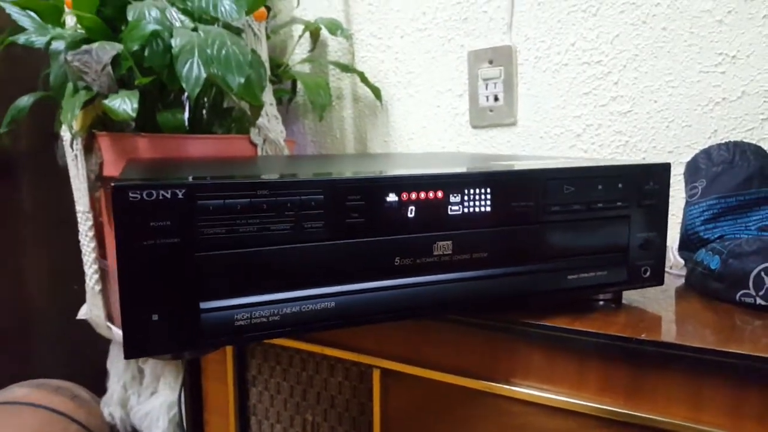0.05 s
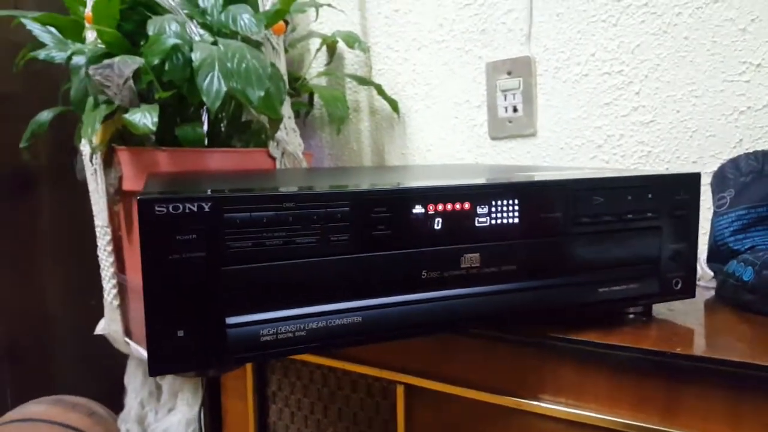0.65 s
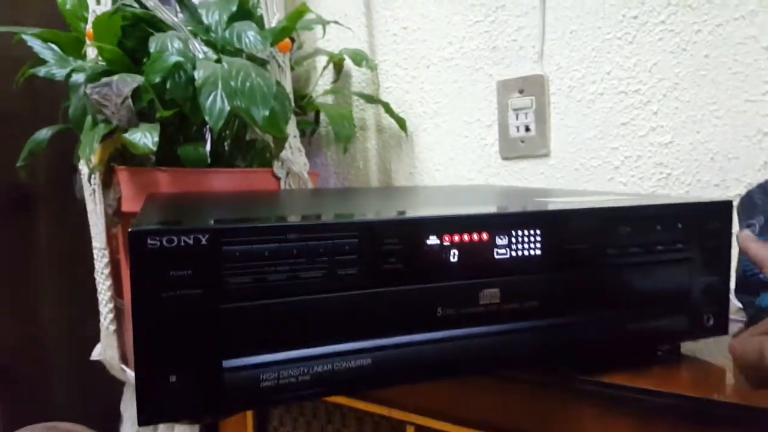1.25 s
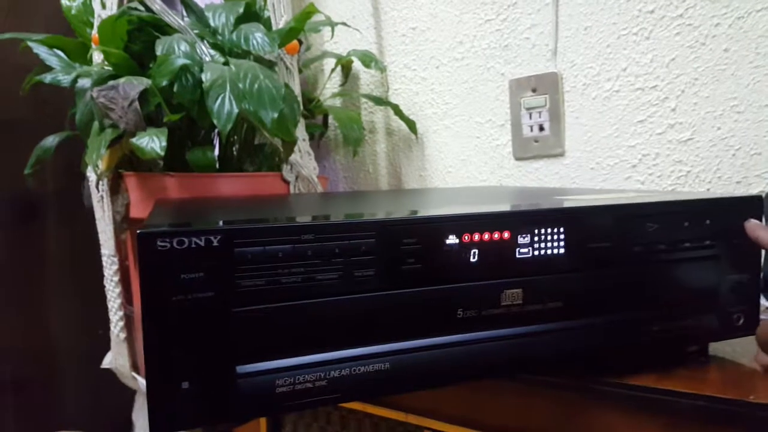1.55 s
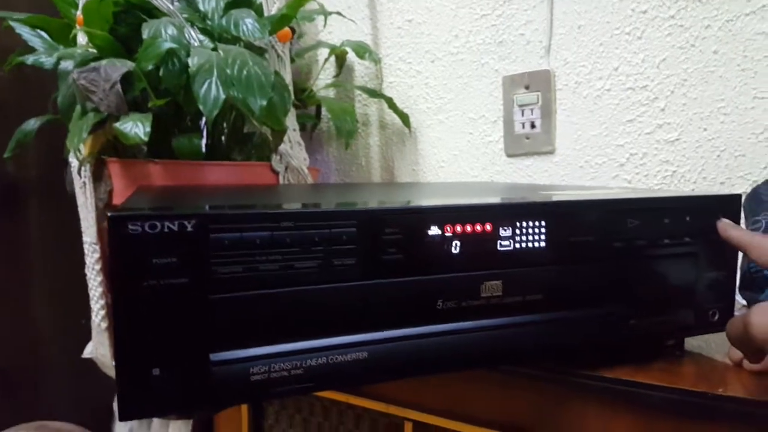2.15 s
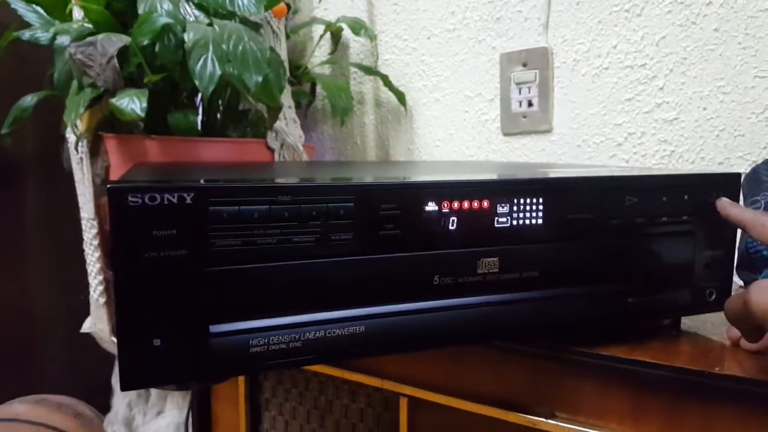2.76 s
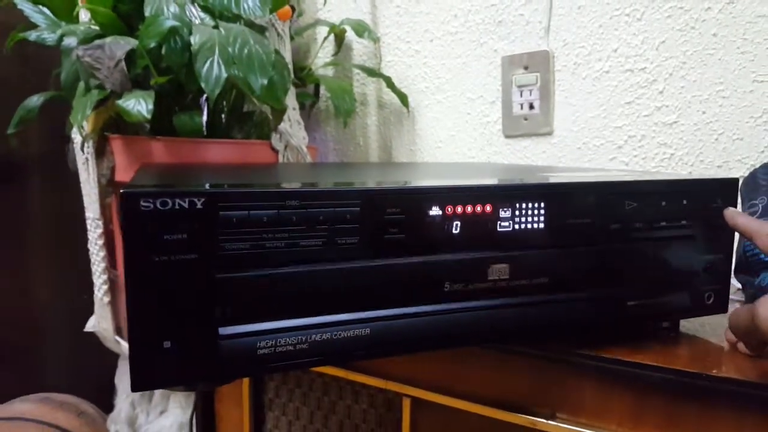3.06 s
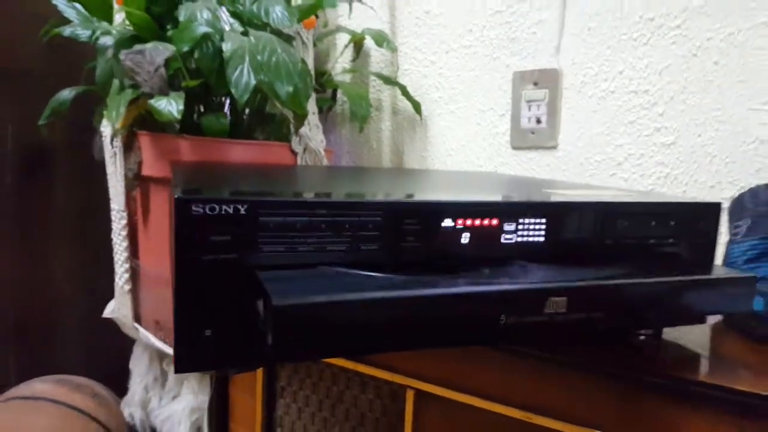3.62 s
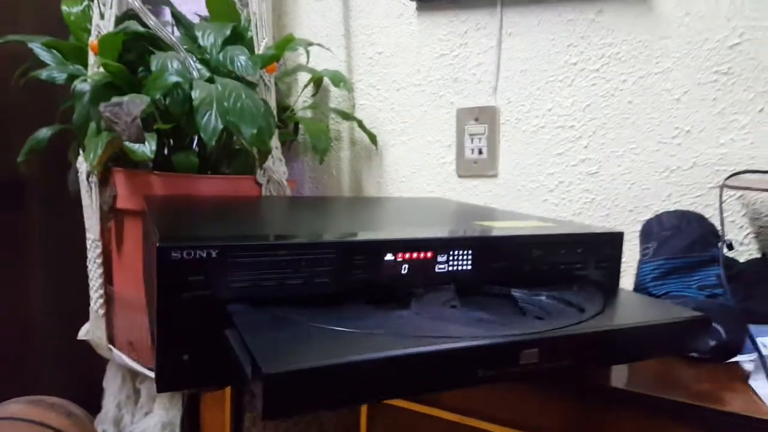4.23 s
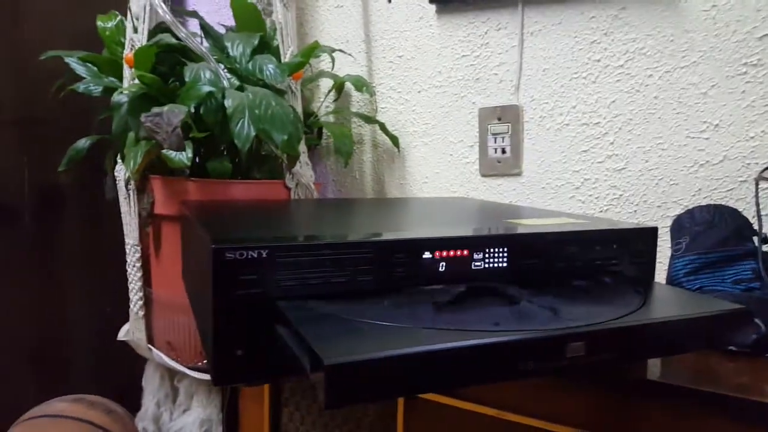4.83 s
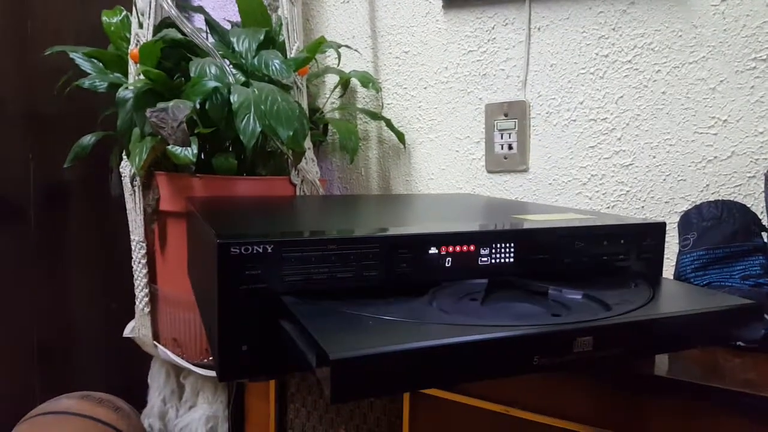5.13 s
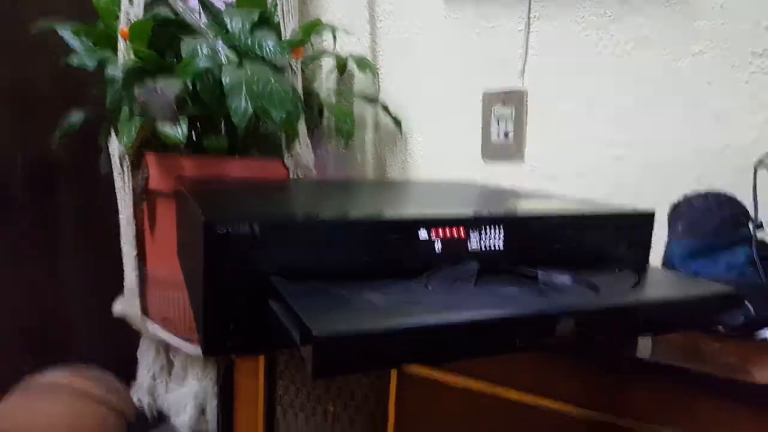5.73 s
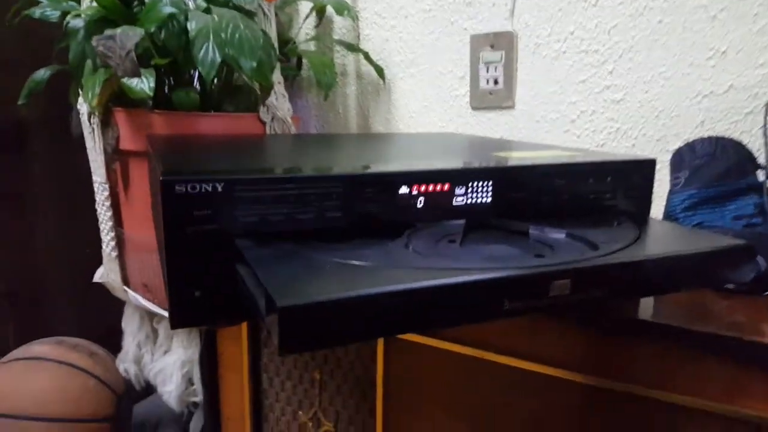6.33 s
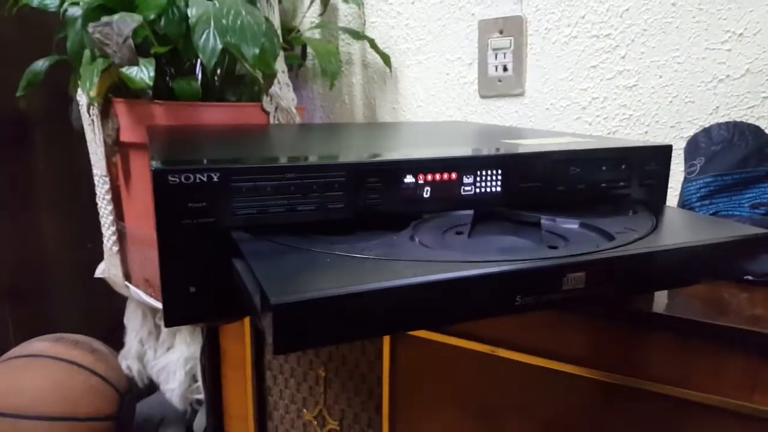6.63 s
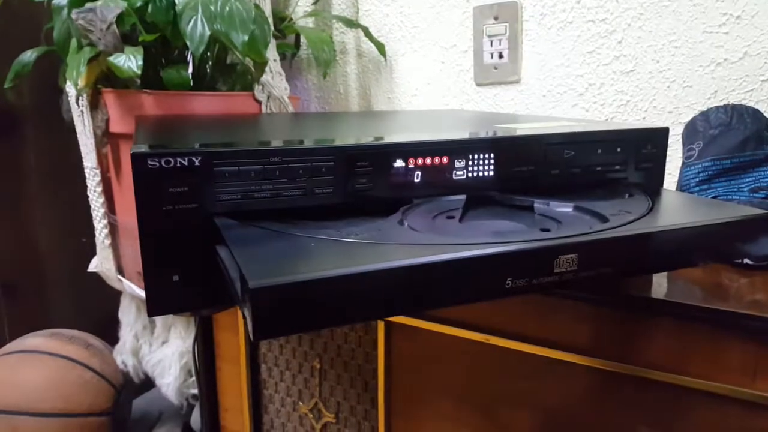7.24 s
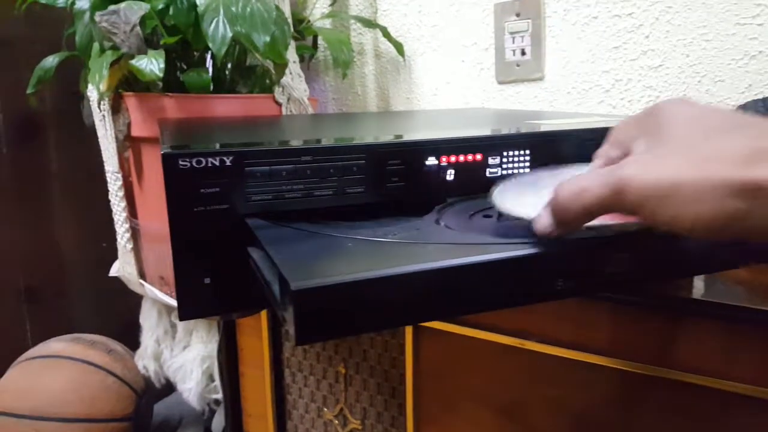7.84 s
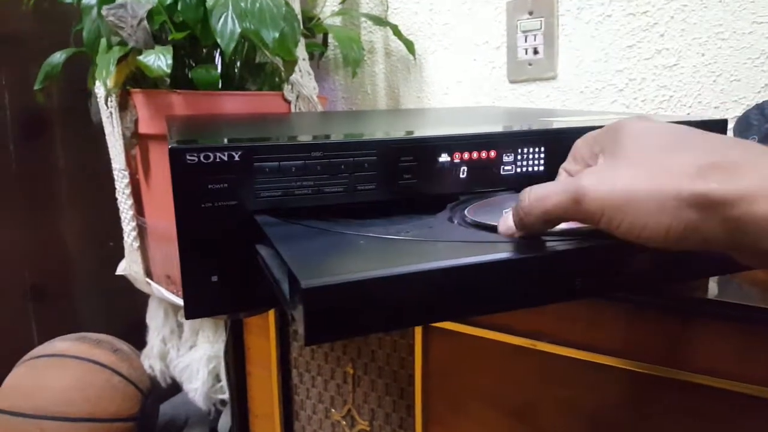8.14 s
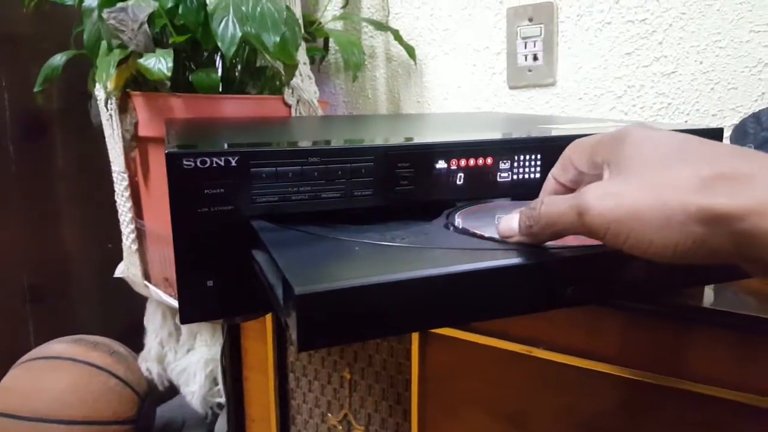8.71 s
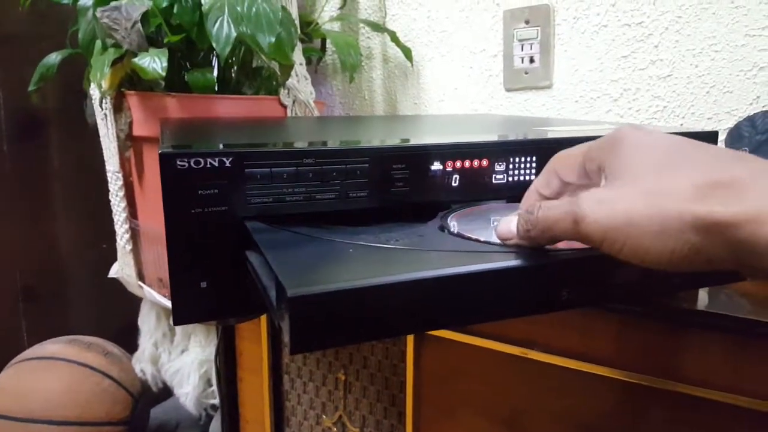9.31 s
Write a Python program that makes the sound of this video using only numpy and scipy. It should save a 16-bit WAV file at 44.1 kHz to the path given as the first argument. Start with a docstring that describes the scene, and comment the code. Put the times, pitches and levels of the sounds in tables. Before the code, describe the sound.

Plastic clicks and whirring gears as a disc player's tray slides out in a quiet room, then a disc clatters into place.

```python
"""A disc changer opens.

A five-disc changer stands on a wooden cabinet in a small, quiet room, about a metre away. Its carousel
rattles round, a latch lets go, the geared tray whirs out and the carousel turns once more. A hand then
clacks a disc into the plastic tray. Impacts ring the modes of tray and case, and sliding parts sound by
stick-slip friction. Mains hum and a faint clock go on underneath."""
import sys
import numpy as np
from scipy import signal
from scipy.fft import rfft, irfft, next_fast_len
from scipy.io import wavfile
from scipy.ndimage import uniform_filter1d

SR = 44100
rng = np.random.default_rng(int(sys.argv[2]) if len(sys.argv) > 2 else 0)


def dump_mix(stems):
    """Bounce the given channels to the path in sys.argv[1] as a 16-bit WAV at rate SR."""
    frames = np.atleast_2d(stems).T  # one column per channel
    limited = np.clip(frames, -1, 1)  # hard clip at full scale
    pcm = np.round(limited * 32767).astype(np.int16)
    wavfile.write(sys.argv[1], SR, pcm)


N = 417627
TIME = np.arange(N) / SR

# low-frequency response of the case: (frequency [Hz], level [dB])
CASE_SPECTRUM = [(45, -28), (80, -5), (115, 4), (165, -3), (240, -0.5), (330, -6), (450, -12), (900, -20),
                 (3000, -94)]


def mechanism_knocks():
    """Impact excitation: cams, latch, end stop and loose gears strike tray and case."""
    # (time [s], level [dB], relative crack [dB], relative thump [dB], part pitch [Hz], crack pitch [Hz])
    blows = [(.511, -50, -40, -29, 1500, 5030), (.644, -40, -29.5, -17, 2300, 7450),
             (.651, -41.5, -36, -13, 1440, 5000), (.68, -47.5, -29, -8, 605, 5000),
             (1.77, -44.5, -34, -7, 770, 4000), (1.862, -37, -27.5, -13, 567, 5500),
             (1.99, -41.5, -46, -9, 710, 5000), (2.275, -45, -40, -11, 1280, 4000),
             (2.3625, -37, -17, -25, 1090, 8700), (2.385, -41.5, -28, -12, 1200, 7500),
             (2.405, -41, -41, -15, 700, 5000), (2.771, -47.5, -49, -9, 604, 5000),
             (2.968, -35.5, -14.5, -20, 2430, 7540), (2.981, -40.5, -36, -5, 1100, 5000),
             (3.039, -40.5, -23, -9, 690, 8500), (3.064, -53, -5.5, -20, 1200, 4800),
             (3.0735, -30, -21, -16, 1656, 3050), (3.11, -41, -22, 0.5, 603, 6500),
             (3.361, -36, -34, -8.5, 1560, 3000), (3.511, -42.5, -22, -18, 1560, 3200),
             (4.277, -37, -32, -17, 890, 3000), (5.295, -49, -24, -8, 2200, 3000)]
    # spectra of the struck body and of the contact: (frequency [Hz], level [dB])
    body_spectrum = [(150, -66), (400, 4), (650, 10), (1000, 4), (1600, 4), (2300, -2.5), (3600, -24),
                     (5000, -40), (10000, -32)]
    crack_spectrum = [(1000, -42), (2500, 8.5), (3600, 3.5), (5000, 0.5), (6500, 1), (9200, -5.5),
                      (10500, -18), (16000, -18)]
    return impacts(blows + light_knocks(), body_spectrum, crack_spectrum,
                   body_t60=.092, crack_t60=.052, thump_t60=.18, contact_s=.00019,
                   body_db=-11, ring_db=-23.5, crack_db=2.5, thump_db=-1.5, part_db=4)


def disc_clacks():
    """Impact excitation: the disc meets the plastic tray and rattles into place."""
    # (time [s], level [dB], relative crack [dB], relative thump [dB], part pitch [Hz], crack pitch [Hz])
    blows = [(7.953, -44, -35, -2.5, 1320, 3000), (8.118, -40.5, -8.5, -26, 1610, 3940),
             (8.31, -49, -35, -3, 1700, 3000), (8.357, -27, -12.5, -14.5, 2120, 8500),
             (8.3645, -20.5, -8, -20, 2070, 3460), (8.373, -25, -23, -17.5, 1520, 3500),
             (8.386, -33.5, -24, -5, 500, 3500), (8.403, -39, -15, -9, 1140, 7940),
             (8.574, -34.5, -14.5, -11.5, 1920, 4700), (9.418, -41, -12, -20, 2240, 7140),
             (9.443, -43, -26, -8, 1000, 4300)]
    # spectra of the struck body and of the contact: (frequency [Hz], level [dB])
    body_spectrum = [(150, -30), (400, -7), (550, 0), (750, -2), (1000, 2), (1300, -1), (1600, 2),
                     (2100, 2), (2700, -7), (3600, -5), (5000, -19), (9000, -27), (10500, -42),
                     (16000, -52)]
    crack_spectrum = [(1000, -25), (2500, -3), (3600, 0), (5000, -3), (6500, -1), (9200, -1), (10500, -14),
                      (13000, -18), (16000, -22)]
    return impacts(blows, body_spectrum, crack_spectrum,
                   body_t60=.096, crack_t60=.041, thump_t60=.45, contact_s=.00032,
                   body_db=-12, ring_db=-15.5, crack_db=-4.5, thump_db=-3, part_db=-2)


def impacts(blows, body_spectrum, crack_spectrum, body_t60, crack_t60, thump_t60, contact_s,
            body_db, ring_db, crack_db, thump_db, part_db):
    """Damped free vibration: each blow cracks at the contact, rings part and tray, and thumps the case."""
    # modes of tray and case: (frequency [Hz], level [dB], t60 [s])
    modes = [(312, -8, .25), (500, -9, .16), (592, -14, .18), (1030, -10, .12), (1160, -6, .2),
             (1300, -8, .12), (1524, -1, .14), (1620, -7, .13), (1875, -2, .13), (2024, -6, .14),
             (2147, -5, .13), (2330, -5, .14), (2556, -10, .15), (3017, -10, .14), (3208, -10, .14),
             (3570, -9, .12), (4050, -8, .15), (4535, -11, .15)]
    out, t = np.zeros((2, N)), np.arange(SR // 4) / SR
    hz, mode_db, t60 = np.transpose(modes)[:, :, None]
    vibration = amp(mode_db) * decay(t, t60) * np.exp(2j * np.pi * hz * t)
    for time, db, bright_db, deep_db, part_hz, crack_hz in blows:
        # a dull blow is a soft contact, which takes longer to build up
        onset = 1 - np.exp(-t * amp(bright_db / 2) / contact_s)
        # the point of contact decides how each mode starts
        phases = np.exp(2j * np.pi * rng.random(len(hz)) + .55j * rng.standard_normal((2, len(hz))))
        ring = equal_energy((phases @ vibration).imag * onset)
        body = noise_pulse(onset * decay(t, body_t60), body_spectrum, width=.45)
        crack = noise_pulse(onset * decay(t, crack_t60), crack_spectrum, width=.8)
        thump = noise_pulse(onset * decay(t, thump_t60), CASE_SPECTRUM, width=.15)
        body = equal_energy(body + resonate(body, [(part_hz, part_hz / 5, part_db)]))
        crack = equal_energy(crack + resonate(crack, [(crack_hz, crack_hz / 5, 6)]))
        blow = (amp(body_db) * body + amp(ring_db) * ring + amp(bright_db + crack_db) * crack
                + amp(deep_db + thump_db) * equal_energy(thump))
        add(out, time, amp(db) * blow)
    return out


def light_knocks(jitter_s=.002, scatter_db=2, thump_db=-9.5, part_hz=1380, crack_hz=4940):
    """Impact trains: the turning carousel ticks, loose gears rattle, the tray chatters at its stop."""
    # (start [s], end [s], spacing [s], level [dB], first relative crack [dB], last relative crack [dB])
    runs = [(0.9, 1.4, .11, -50.5, -29, -21.5), (1.491, 1.8, 0.084, -51, -19, -19.5),
            (3.717, 4.22, 0.11, -50.5, -15, -17), (4.323, 4.39, 0.024, -45.5, -28, -22),
            (4.394, 4.65, .098, -51.5, -13.5, -11), (4.795, 5.25, 0.097, -50, -17.5, -30)]
    blows = []
    for start, end, spacing, db, first_db, last_db in runs:
        for time in np.arange(start, end, spacing):
            timing, strength, pitch = rng.standard_normal(3)
            bright_db = np.interp(time, [start, end], [first_db, last_db])
            blows.append((time + jitter_s * timing, db + scatter_db * strength, bright_db, thump_db,
                          part_hz * np.exp(.21 * pitch), crack_hz))
    return blows


def gear_train(tooth_hz=99, wheel_hz=10, scatter_db=3.5, wobble_db=1.2, grind_db=-3, ring_db=-8):
    """Gear meshing: teeth tap unevenly over a fine grind; an eccentric wheel modulates the amplitude."""
    # idling, turning the carousel, unlatching, driving the tray, turning again:
    # (start [s], end [s], first level [dB], last level [dB])
    runs = [(0, .85, -71, -67), (.85, 2.6, -64.5, -61), (2.6, 3.03, -63, -65), (3.03, 4.4, -55, -60.5),
            (4.4, 5.31, -63.5, -61.5)]
    # gear noise through the case: (frequency [Hz], level [dB])
    spectrum = [(100, -15.5), (300, 2.5), (480, -5.5), (640, 2.5), (950, -0.5), (1250, 1.5), (1500, -2),
                (1750, -4), (2100, -7), (3200, -10), (4200, -14), (6000, -19.5), (9000, -28), (11000, -48)]
    teeth_passed = np.cumsum(tooth_hz * (1 + .12 * wander(20))) / SR
    taps = np.diff(np.floor(teeth_passed), prepend=0) * amp(scatter_db * rng.standard_normal(N))
    tap_decay = decay(np.arange(SR // 20) / SR, t60=.029)
    chatter = unit_rms(signal.oaconvolve(taps, tap_decay)[:N] * stereo_noise(N, .43))
    wheel = np.sin(2 * np.pi * np.cumsum(wheel_hz * (1 + .109 * wander(4.74))) / SR)
    whir = unit_rms(colour(chatter + amp(grind_db) * stereo_noise(N, .36), spectrum))
    # the carousel plate vibrates in sympathy
    plate = resonate(whir, [(573, 47, .5), (741, 11, 5.5), (1145, 66, -19), (1452, 25, -1),
                            (1640, 35, -14)])
    load = envelope(runs, attack_s=.025, release_s=.3) * amp(wobble_db * wheel + .77 * wander(30))
    return unit_rms(whir + amp(ring_db) * unit_rms(plate)) * load


def motor_and_belt(motor_hz=317):
    """Forced vibration and friction: the motor drones under a shifting load and its belt hisses."""
    # the motor frees the latch, then drives the tray; the belt rubs louder under load:
    # (start [s], end [s], first level [dB], last level [dB])
    motor_runs = [(2.48, 2.72, -59, -53.5), (3.12, 4.18, -51.5, -57)]
    belt_runs = [(0, 5.3, -82, -79.5), (.19, 0.34, -68, -69.5), (2.46, 4.2, -70.5, -67.5)]
    # belt hiss: (frequency [Hz], level [dB])
    belt_spectrum = [(1000, -19), (2600, 2.5), (4000, -6.5), (6300, -2.5), (7800, 0), (9100, 1),
                     (10300, -10.5), (15500, -12)]
    phase = 2 * np.pi * np.cumsum(motor_hz * (1 + .042 * wander(32))) / SR
    drone = unit_rms(np.sin(phase)) * envelope(motor_runs, attack_s=.043, release_s=.32)
    drone *= amp(-3 + 1.1 * wander(35))
    hiss = steady_noise(belt_spectrum, width=1) * envelope(belt_runs, attack_s=.023, release_s=.16)
    hiss *= amp(1.1 * np.sin(phase / 10) + 2 * wander(37))
    return drone + hiss


def guides_and_rails():
    """Sliding and rolling noise: the tray brushes its guides; tray and carousel rumble through the case."""
    # (start [s], end [s], first level [dB], last level [dB])
    brushes = [(1.88, 2.1, -70, -71), (4.02, 4.21, -64, -63)]
    rolls = [(.85, 2.9, -63, -61), (2.96, 3.42, -47.5, -51), (3.42, 4.42, -56.5, -56.5),
             (4.42, 5.3, -60.5, -62.5)]
    # swish of the guides: (frequency [Hz], level [dB])
    swish_spectrum = [(2000, -12), (4500, -5), (6500, -3), (8700, 3), (10500, -9), (13000, -5),
                      (15500, -13)]
    swish = steady_noise(swish_spectrum, width=1) * envelope(brushes, attack_s=.066, release_s=.28)
    rumble = steady_noise(CASE_SPECTRUM, width=.17) * envelope(rolls, attack_s=.034, release_s=.4)
    return swish + amp(-1) * rumble


def runner_and_rack():
    """Stick-slip friction: a runner catches and the pinion scrapes along its rack."""
    # (start [s], end [s], first level [dB], last level [dB])
    runner_slides = [(3.25, 3.39, -56.5, -53.5), (3.46, 3.55, -60, -61)]
    rack_runs = [(2.46, 2.95, -69.5, -65), (3.35, 4.05, -60.5, -64.5)]
    # (frequency [Hz], bandwidth [Hz], level [dB])
    runner_modes = [(1570, 310, 6.5), (2480, 400, 3.5), (4300, 370, -3), (5600, 350, -9), (6800, 400, -6),
                    (8000, 400, -23), (9100, 650, -8)]
    rack_modes = [(640.7, 57, -1), (1504, 200, 6.5), (1660, 210, 5), (3200, 490, -12.5), (7840, 900, -20),
                  (8900, 550, -17)]
    runner = stick_slip(envelope(runner_slides, attack_s=.05, release_s=.49), runner_modes, catch_db=1)
    rack = stick_slip(envelope(rack_runs, attack_s=.12, release_s=1), rack_modes, catch_db=2)
    return runner + rack


def disc_slide():
    """Stick-slip friction: the disc slides in the fingers and over the tray; its edge skims the well."""
    # (start [s], end [s], first level [dB], last level [dB])
    slides = [(7.53, 8.12, -74.5, -69.5), (8.12, 8.35, -65.5, -67)]
    skims = [(7.92, 8.11, -73, -75.5), (8.3, 8.35, -74, -71)]
    # (frequency [Hz], bandwidth [Hz], level [dB])
    disc_modes = [(1640, 540, 5.5), (2300, 780, 4), (3140, 1100, -5)]
    edge_modes = [(5700, 1500, -5), (7900, 280, -1), (8900, 770, -5)]
    face = stick_slip(envelope(slides, attack_s=.025, release_s=.2), disc_modes, catch_db=1.5)
    edge = stick_slip(envelope(skims, attack_s=.016, release_s=.12), edge_modes, catch_db=-3)
    return face + edge


def stick_slip(gain, modes, catch_db):
    """Frictional excitation: plastic catches and slips, driving steep resonances of the sliding part."""
    sliding = gain > amp(-110)
    slips = (stereo_noise(N, .81) * amp(catch_db * wander(250)))[:, sliding]
    ring = sum(resonate(resonate(slips, [(hz, width, db)]), [(hz, width, 0)]) for hz, width, db in modes)
    out = np.zeros((2, N))
    out[:, sliding] = unit_rms(ring)
    return out * gain


def tray_creak(time_s=6.65, db=-63, t60=.013):
    """A damped transient: the open tray settles with one thin snap."""
    # (frequency [Hz], level [dB])
    spectrum = [(2000, -35), (4500, -13), (6000, -1), (8500, 1), (12000, -9), (16000, -7)]
    out, t = np.zeros((2, N)), np.arange(SR // 10) / SR
    snap = colour(stereo_noise(len(t), .54) * decay(t, t60), spectrum)
    add(out, time_s, amp(db) * equal_energy(snap))
    return out


def soft_ticks():
    """Reverberant ticks with a weak ping: one louder at first, then two accents on the clock's beat."""
    # (time [s], level [dB], resonance [Hz])
    ticks = [(.306, -53, 2900), (2.251, -61, 2780), (9.26, -59, 3100)]
    out = np.zeros((2, N))
    for time, db, hz in ticks:
        add(out, time, diffuse_click(db, hz, rise_s=.0029, t60=.2, ring_db=4))
    return out


def clock(first_s=1.241, period_s=.997, db=-58, tick_hz=2900, tock_hz=4440):
    """Periodic impacts: a clock across the room ticks and tocks at two resonant frequencies."""
    out = np.zeros((2, N))
    for k, time in enumerate(np.arange(first_s, N / SR, period_s)):
        hz = tock_hz if k % 2 else tick_hz
        add(out, time, diffuse_click(db, hz, rise_s=.0058, t60=.41, ring_db=16.5))
    return out


def diffuse_click(db, hz, rise_s, t60, ring_db, ring_t60=.081, bandwidth_hz=110):
    """Reverberant smearing: a small click arrives nearly all as reflections, with a brief ping."""
    # (frequency [Hz], level [dB])
    spectrum = [(300, -4.5), (800, 2.5), (2500, -3), (3700, -6), (4500, -6.5), (5200, -11.5), (8000, -13),
                (11000, -33)]
    t = np.arange(SR // 2) / SR
    onset = 1 - np.exp(-t / rise_s)
    click = colour(stereo_noise(len(t), 1.55) * onset * decay(t, t60), spectrum)
    ping = resonate(click * decay(t, ring_t60), [(hz, bandwidth_hz, ring_db)])
    return amp(db) * equal_energy(click + ping)


def mains_hum():
    """A harmonic series on the mains frequency, wavering slightly in phase."""
    # (frequency [Hz], rms level [dB])
    harmonics = [(59.2, -50.5), (118.4, -67), (177.6, -73), (236.9, -70), (473.7, -80)]
    drift = .07 * wander(6) / harmonics[0][0]
    return np.sqrt(2) * sum(amp(db) * np.sin(2 * np.pi * (hz * TIME + rng.random()) + hz * drift)
                            for hz, db in harmonics)


def room_noise(db=-61, swell_db=.6):
    """Ambient noise: a soft, low diffuse field whose level drifts slowly."""
    # (frequency [Hz], level [dB])
    spectrum = [(20, -11), (42, -5.5), (60, -1.5), (85, -6), (120, 2), (160, -3.5), (220, -1), (280, -7.5),
                (340, -7.5), (450, -10), (800, -16), (1600, -22.5), (2500, -24), (5000, -31), (8500, -33.5),
                (10500, -38), (15500, -32.5)]
    gain = amp(db + swell_db * wander(3))
    return unit_rms(colour(diffuse_noise(N), spectrum)) * gain


def room(x, t60=.27, wet_db=-11, gap_s=.0083):
    """Reverberation: near walls answer with a short, slightly dull tail."""
    t = np.arange(SR // 2) / SR
    reflections = diffuse_noise(len(t)) * decay(t, t60) * (t > gap_s)
    tail = colour(reflections, [(100, 8), (1500, 6), (7000, -2), (12000, .5)])
    tail /= np.sqrt(np.sum(tail ** 2, axis=-1, keepdims=True))
    return x + amp(wet_db) * signal.oaconvolve(x, tail, axes=-1)[:, :N]


def from_left(x, lag_samples):
    """Level and time differences: sound reaches the left channel brighter and sooner."""
    # (frequency [Hz], left level over right [dB])
    level_difference = [(100, 0), (500, .8), (1200, 3), (2500, 1.5), (4500, 2), (6300, 4), (8000, 10),
                        (10000, 6), (13000, 0)]
    size = next_fast_len(N + SR // 10, True)
    tilt = np.sqrt(bin_gains(level_difference, size))
    left, right = irfft(rfft(x, size) * np.array([tilt, 1 / tilt]), size)[:, :N]
    return np.array([left, np.pad(right, (lag_samples, 0))[:N]])


def diffuse_noise(size):
    """A diffuse field: the two channels are coherent only in the bass."""
    side_spectrum = [(60, -12), (250, -10.5), (700, -2.5), (2000, 1.5), (8000, .5)]
    side = colour(rng.standard_normal(size), side_spectrum)
    return rng.standard_normal(size) + np.array([side, -side])


def stereo_noise(size, width):
    """Partial coherence: shared noise plus an independent part in each channel."""
    return unit_rms(rng.standard_normal(size) + width * rng.standard_normal((2, size)))


def steady_noise(spectrum, width):
    """Stationary coloured noise at rms 1."""
    return unit_rms(colour(stereo_noise(N, width), spectrum))


def noise_pulse(shape, spectrum, width):
    """Source and filter: a pulse of noise takes on a spectrum."""
    return colour(stereo_noise(len(shape), width) * shape, spectrum, size=1024)


def resonate(x, peaks):
    """Parallel resonators: (frequency [Hz], bandwidth [Hz], level [dB])."""
    return sum(amp(db) * signal.lfilter(*signal.iirpeak(hz, hz / width, SR), x) for hz, width, db in peaks)


def colour(x, spectrum, size=4096):
    """Minimum-phase filtering by a spectrum: (frequency [Hz], level [dB])."""
    cepstrum = irfft(np.log(bin_gains(spectrum, size)))
    cepstrum[1:size // 2] *= 2
    cepstrum[size // 2 + 1:] = 0
    response = irfft(np.exp(rfft(cepstrum))).reshape((1,) * (x.ndim - 1) + (-1,))
    return signal.oaconvolve(x, response, axes=-1)[..., :x.shape[-1]]


def bin_gains(spectrum, size):
    """A spectrum's gain at each Fourier bin, interpolated in log frequency."""
    hz, db = np.transpose(spectrum)
    return amp(np.interp(np.log(np.fft.rfftfreq(size, 1 / SR) + 1), np.log(hz), db))


def envelope(runs, attack_s, release_s):
    """Each movement rises linearly, runs along a level ramp and decays exponentially."""
    gain = np.zeros(N)
    for start, end, first_db, last_db in runs:
        attack = np.clip((TIME - start) / attack_s, 0, 1)
        ramp = amp(np.interp(TIME, [start, end], [first_db, last_db]))
        release = decay(np.maximum(TIME - end, 0), release_s)
        gain = np.maximum(gain, attack * ramp * release)
    return gain


def wander(rate_hz):
    """Smooth random fluctuation at rms 1."""
    hold = int(SR / rate_hz)
    steps = np.repeat(rng.standard_normal(N // hold + 1), hold)
    return unit_rms(uniform_filter1d(steps, hold)[:N])


def decay(t, t60):
    """Exponential damping: 60 dB down after t60 seconds."""
    return np.exp(-np.log(1000) * t / t60)


def amp(db):
    """Decibels to amplitude ratio."""
    return 10 ** (np.asarray(db) / 20)


def unit_rms(x):
    """Scale to rms 1."""
    return x / np.sqrt(np.mean(x ** 2))


def equal_energy(x):
    """Scale a transient to the energy of 20 ms at rms 1."""
    return x * np.sqrt(.02 * SR / np.mean(np.sum(x ** 2, axis=-1)))


def add(out, time_s, sound):
    """Superpose a sound at a given time."""
    i = int(time_s * SR)
    out[:, i:i + sound.shape[-1]] += sound[:, :max(N - i, 0)]


def scene():
    """Superposition: changer and disc sound in the room, over the clock and the hum."""
    knocks, clacks = mechanism_knocks(), disc_clacks()
    changer = (knocks + runner_and_rack() + gear_train() + motor_and_belt() + guides_and_rails()
               + tray_creak())
    disc = clacks + disc_slide()
    direct = from_left(changer, lag_samples=3) + from_left(disc, lag_samples=1)
    return room(direct) + clock() + soft_ticks() + mains_hum() + room_noise()


def record(dry, cutoff_hz=15800):
    """Band limiting: a steep low-pass filter removes the highest treble."""
    return signal.sosfilt(signal.ellip(10, .2, 70, cutoff_hz, fs=SR, output="sos"), dry)


dry = scene()
out = record(dry)
dump_mix(out)
```